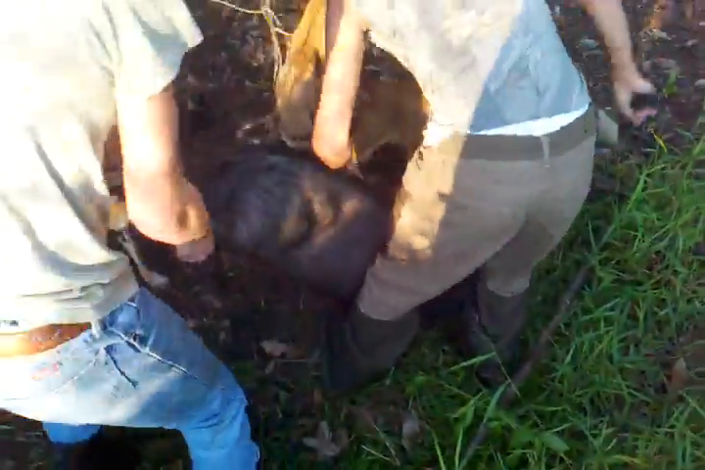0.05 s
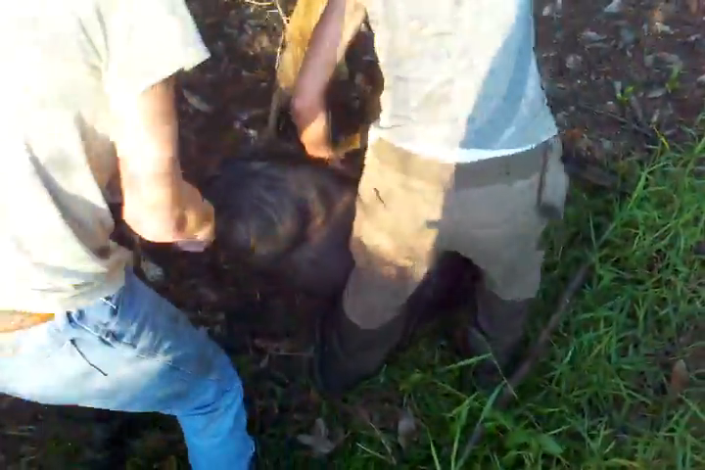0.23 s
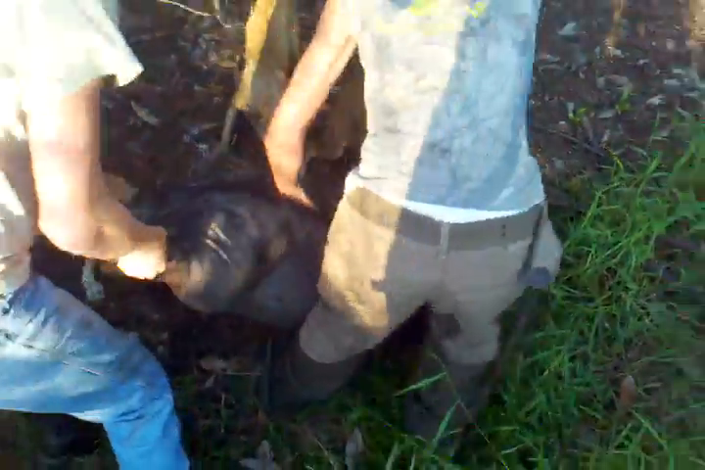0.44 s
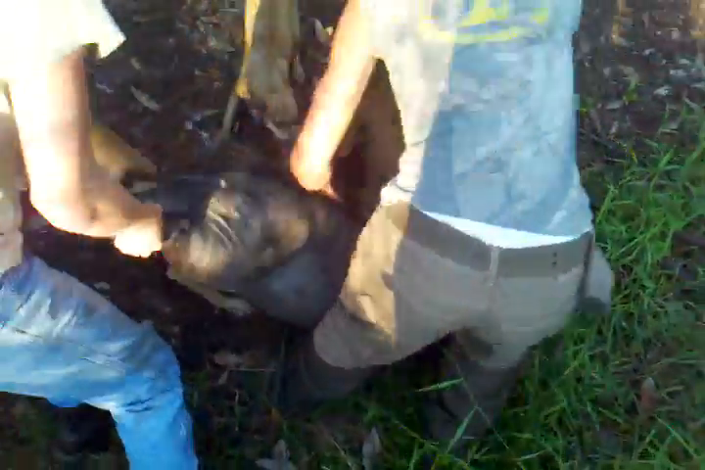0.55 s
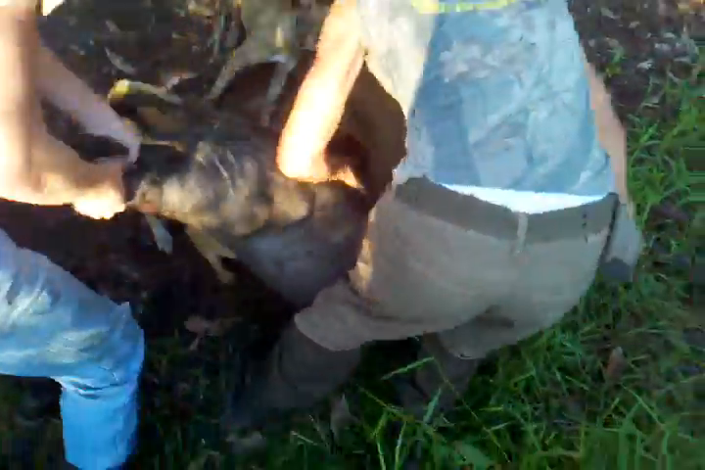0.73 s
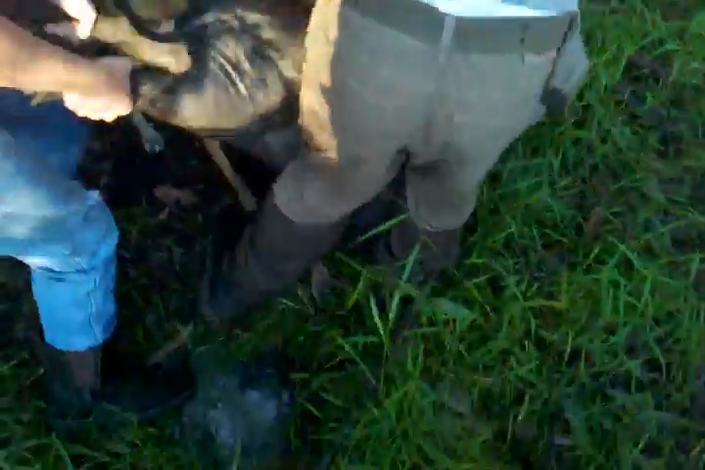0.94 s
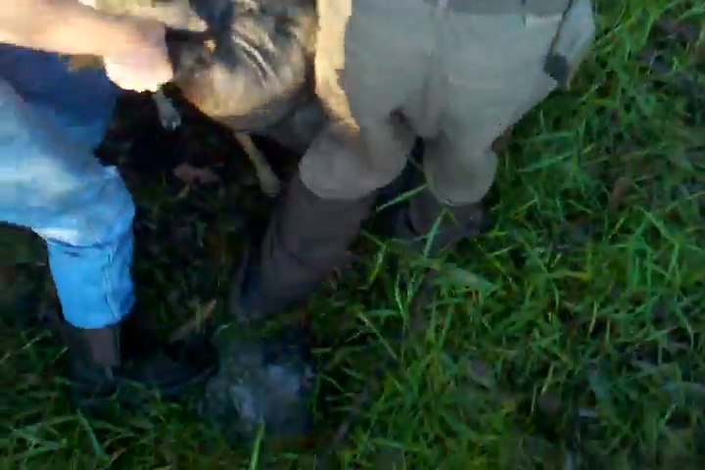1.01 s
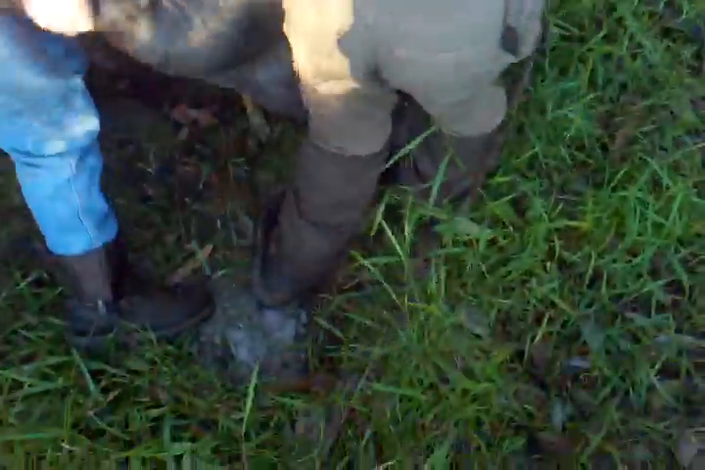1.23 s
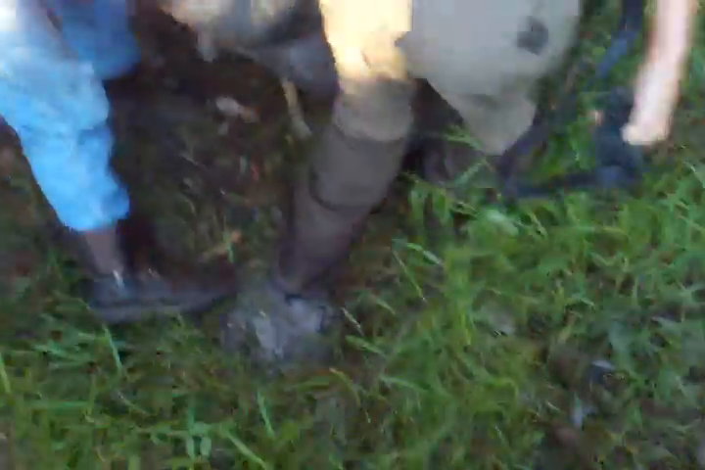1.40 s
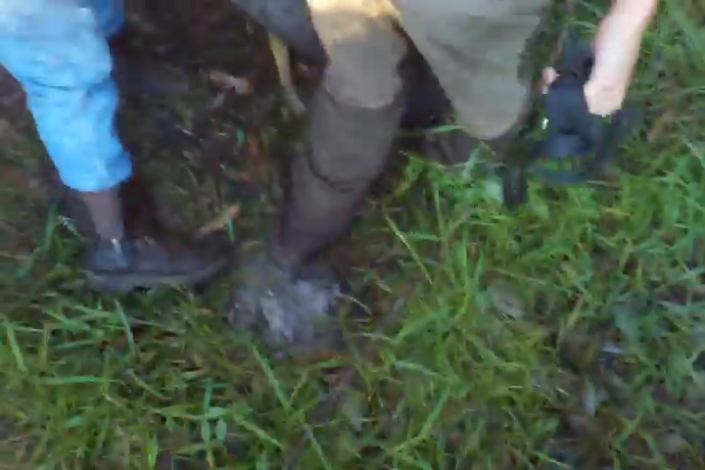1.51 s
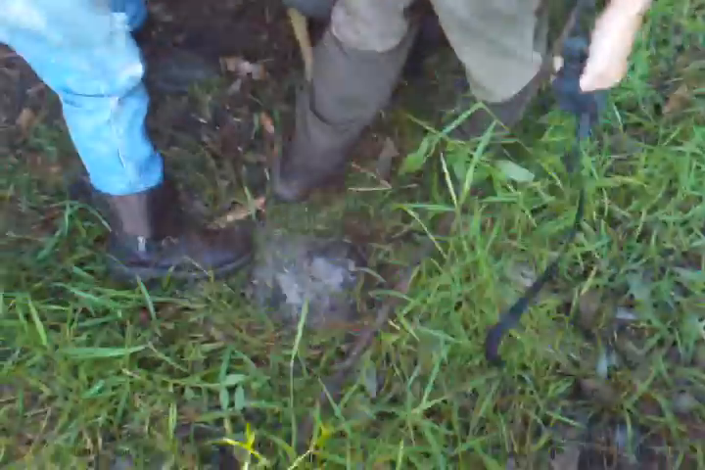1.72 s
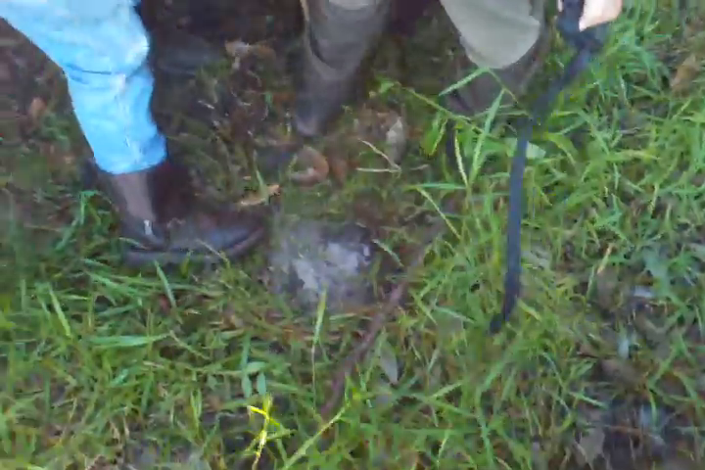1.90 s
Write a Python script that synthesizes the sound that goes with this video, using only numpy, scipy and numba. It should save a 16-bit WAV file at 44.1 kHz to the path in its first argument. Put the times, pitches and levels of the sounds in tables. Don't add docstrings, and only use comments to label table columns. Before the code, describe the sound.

A pinned hog gives one long shrill squeal, starting almost at once, raspy and wavering, close to a small handheld camera outdoors; it stops abruptly, leaving faint leaf rustle and a few twig ticks.

```python
import sys
import numpy as np
from scipy import signal
from scipy.fft import rfft, irfft, next_fast_len
from scipy.io import wavfile
from scipy.ndimage import uniform_filter1d
from numba import njit

SR = 44100
rng = np.random.default_rng(int(sys.argv[2]) if len(sys.argv) > 2 else 0)


def convert_level_to_amplitude(level_db):
    exponent = np.asarray(level_db, float) / 20
    return 10 ** exponent


def bounce(signal):
    frames = np.transpose(np.atleast_2d(signal))
    limited = np.clip(frames, -1, 1)
    pcm = np.round(limited * 32767).astype(np.int16)
    wavfile.write(sys.argv[1], SR, pcm)


N = 85995

# (frequency [Hz], density [dB per Hz])
FIELD_COLOUR = [(100, -7.5), (900, -8), (1300, -7.5), (2300, -12.5), (3000, -20), (4500, -17), (8000, -8.5),
                (14000, -22.5)]
# (time [s], effort [dB], mouth resonance [Hz], mouth strength [dB], flutter rate [1/s])
BREATH = [(.055, -27.5, 1600, -39, 172), (.13, -29, 1465, 8, 193), (.24, -31.5, 1517, 2, 193.6),
          (.32, -28.5, 1720, 8.5, 192), (.45, -29.5, 1707, 9, 194), (.5, -28.5, 1777, 5, 208),
          (.57, -25, 1676, 10, 212), (.69, -26, 1688, 2.5, 195), (.79, -26.5, 1810, 6, 184),
          (.89, -26, 1996, 2, 212), (1.04, -27, 1590, 2.5, 206), (1.19, -28.5, 1590, -6, 195.3),
          (1.29, -26.5, 1902, 4, 216), (1.4, -26.5, 1586, -0.5, 169), (1.555, -26, 1562, 3, 173),
          (1.61, -30.5, 1700, 14.5, 180), (1.655, -29.5, 1411, 12.5, 205), (1.685, -35.5, 1192, -10, 208)]
# (centre [Hz], width [Hz], level before [dB], level after [dB])
THROAT = [(216, 100, -22.5, -22), (350, 160, -17.5, -19), (440, 85, -23.5, -10.5), (585.7, 65, -11, -15),
          (722, 63, -14.5, -12.5), (763, 97, -15.5, -8.5), (1094, 337, -10, -2.5), (1450, 840, -3, -4.5),
          (2174, 380, -3, -2), (2728, 105, -9, -3)]
# (time [s], nose resonance [Hz], nose [dB], overtones [dB], palate resonance [Hz], palate [dB])
PALATE_NOSE = [(.12, 4240, -11, -3, 2080, -5), (.17, 4070, -12, -5, 1900, 2.5),
               (.25, 4100, -11, -9, 1960, -16), (.32, 4170, -4, -12, 1850, -3.5),
               (.42, 4050, -13, -2.5, 1960, 3.5), (.53, 4230, -7.5, 3, 2110, 6.5),
               (.66, 4130, -17, -2, 2020, -15), (.73, 4200, -6, -3, 2100, 0.5),
               (.87, 4700, -6.5, -1.5, 2156, 3.5), (.91, 4580, -15, -0.5, 2080, -7),
               (.99, 4220, -10, -0.5, 2110, 0.5), (1.14, 4200, -10.5, 7, 2100, -18),
               (1.3, 4818, -10.5, 2, 2260, 3.5), (1.36, 4200, -24, -12, 2098, 4),
               (1.44, 4410, -27, -10, 2150, -1.5), (1.53, 4600, -22, -3.5, 2191, 2.5),
               (1.58, 4650, -7, 1, 2004, -15), (1.67, 4350, -24, 4, 2000, 3)]
# (delay [s], level [dB])
ECHOES = [
    (.011, -15.5),
    (0.023, -24),
    (0.042, -32),
]
# (time [s], pitch [Hz], level [dB], roughness [0-1])
WHISTLE = [(.09, 1259, -51, 0.59), (.33, 1348, -25.5, 0.45), (.5, 1320, -28.5, 0.47),
           (.62, 1270, -19.5, 0.32), (.66, 1347, -15.5, 0.26), (.76, 1302, -17.5, 0.3),
           (.81, 1296, -25.5, 0.8), (.88, 1400, -16, 0.39), (.94, 1387, -20.5, 0.55),
           (1.04, 1398, -10.5, 0.15), (1.12, 1389, -20.5, 0.28), (1.2, 1414, -12.5, 0.19),
           (1.28, 1450, -16, 0.21), (1.38, 1415, -12, 0.54), (1.49, 1430, -14, 0.45),
           (1.55, 1460, -29.5, 0.69), (1.61, 1452, -19, 0.54), (1.675, 1167, -25, 0.64)]
# (multiple of the pitch [-], level over effort [dB])
OVERTONES = [(2, -0.5), (3, -16.5), (4, -14)]
# (time [s], length [s], pitch [Hz], rise [Hz], level [dB])
CATCHES = [
    (0.105, 0.057, 1007, -1, -25.5),
    (0.153, 0.57, 635, -40.5, -35.5),
    (0.151, 0.51, 350, 21, -41.5),
    (0.85, 0.027, 581.6, -9, -23),
    (.87, 0.094, 440, 17, -27),
    (0.932, 0.14, 575, 1, -25.5),
    (1.104, 0.192, 750, 66, -28.5),
    (1.768, 0.06, 790, 116, -49),
]
# (centre [Hz], width [Hz], level [dB])
HISS = [(3376, 102, -13.5), (4170, 400, -16.5), (4600, 400, -13.5), (5890, 770, -6.5), (6310, 550, -5.5),
        (7580, 610, -12), (8440, 610, -7), (8900, 2600, -7.5), (12300, 6900, -11)]
# (time [s], resonance [Hz], level [dB])
TEETH = [(.12, 7200, -31), (.3, 7520, -20.5), (.56, 6960, -5), (.72, 7183, -8), (.88, 7440, -14.5),
         (1.03, 7470, -2), (1.2, 7314, -5), (1.3, 8050, 0), (1.4, 7960, -15.5), (1.53, 6824, -7.5),
         (1.6, 7400, 0.5), (1.67, 6797, -7.5)]
# (time [s], level [dB])
BUMPS = [
    (.425, -60),
    (0.72, -54),
    (0.901, -75),
    (1.44, -61),
]
# (time [s], peak [dB], centre [Hz])
TICKS = [
    (1.7075, -34, 13200),
    (1.7805, -30, 10200),
    (1.7805, -36, 7300),
    (1.781, -43, 4500),
    (1.835, -48, 600),
    (1.761, -52, 800),
]

FLUTTER_SHIMMER_DB, BEAT_DEPTH = -1.5, 0.5
TIME = np.arange(N) / SR


def in_time(rows):
    s, *columns = np.transpose(rows)
    return [np.interp(TIME, s, c) for c in columns]


def rms_one(x):
    return x / np.sqrt(np.mean(x ** 2) + 1e-20)


def drift(rate):
    r = np.exp(-2 * np.pi * rate / SR)
    noise = rng.standard_normal(N + 9000)
    return rms_one(signal.lfilter([1], [1, -2 * r, r * r], noise)[9000:])


def cut(x, hz, kind, order=2):
    return signal.sosfilt(signal.butter(order, min(hz, .45 * SR), kind, fs=SR, output="sos"), x)


def phase_of(hz):
    return 2 * np.pi * np.cumsum(hz) / SR


@njit
def glide(x, c, r):
    y = np.zeros_like(x)
    for i in range(2, len(x)):
        y[i] = (1 - r * r) / 2 * (x[i] - x[i - 2]) + 2 * r * c[i] * y[i - 1] - r * r * y[i - 2]
    return y


def resonance(x, hz, width_hz):
    c = np.cos(2 * np.pi * hz / SR) * np.ones(N)
    r = np.exp(-np.pi * width_hz * 1.5 / SR)
    return rms_one(np.array([glide(glide(v, c, r), c, r) for v in x]))


def evened(x):
    local = uniform_filter1d(np.mean(x ** 2, axis=0), int(0.0088 * SR)) + 0.045
    return rms_one(x / local ** 0.2)


def envelope(rows):
    return np.clip((TIME - rows[0][0]) / 0.06, 0, 1) * np.clip((rows[-1][0] - TIME) / 0.012, 0, 1)


def channel_noise():
    shared, a, b = rng.standard_normal((3, N))

    def mix(alike):
        return np.sqrt(alike) * shared + np.sqrt(1 - alike) * np.array([a, b])

    return cut(mix(0.75), 3750, "low") - cut(mix(0.087), 3750, "high")


def field():
    f = np.fft.rfftfreq(N, 1 / SR) + 1
    hz, db = np.transpose(FIELD_COLOUR)
    colour = convert_level_to_amplitude(np.interp(np.log(f), np.log(hz), db))
    return rms_one(irfft(rfft(channel_noise()) * colour, N)) * convert_level_to_amplitude(-49 + drift(39))


def flutter(rate):
    cycle = phase_of(rate * (1 + 0.12 * drift(64.57)))
    puff = rms_one((1 + np.cos(cycle)) / 2 * convert_level_to_amplitude(FLUTTER_SHIMMER_DB * drift(33)))
    return cycle, puff


def throat_source(cycle, puff):
    closures = np.diff(np.floor(cycle / (2 * np.pi) + .5), prepend=0)
    snaps = rms_one(closures * convert_level_to_amplitude(FLUTTER_SHIMMER_DB * drift(70)))
    noise_share = 0.64
    return snaps * (1 - noise_share) + noise_share * puff * channel_noise()


def throat_rasp(source):
    turned = np.clip((TIME - 0.87) / 0.057, 0, 1)
    rasp = 0
    for k, (hz, width_hz, before_db, after_db) in enumerate(THROAT):
        ring = evened(resonance(source, hz * (1 + 0.028 * drift(10.0)), width_hz))
        level_db = before_db + (after_db - before_db) * turned + 2.0 * drift(3.27)
        rasp = rasp + (-1) ** k * convert_level_to_amplitude(level_db) * ring
    return cut(rasp, 120, "high")


def mouth_ring(source, cycle, mouth_hz, mouth_db, palate_hz, palate_db):
    sung = np.sin(phase_of(mouth_hz + 22 * drift(69))) * (1 + BEAT_DEPTH * np.cos(cycle))
    ring = evened(resonance(source, mouth_hz, 148))
    mouth = convert_level_to_amplitude(mouth_db - 1.2) * (ring + convert_level_to_amplitude(-4 + 1.8 * drift(74)) * sung)
    return mouth - convert_level_to_amplitude(palate_db) * evened(resonance(source, palate_hz, 330))


def trees(x):
    dull = cut(x, 1970, "low")
    return sum(convert_level_to_amplitude(db) * np.pad(dull, ((0, 0), (int(s * SR), 0)))[:, :N] for s, db in ECHOES)


def whistle(cycle, effort_db, over_db):
    hz, level_db, rough = in_time(WHISTLE)
    wander = 91.9 * rough * drift(119.6)
    ground, upper = phase_of(hz + wander), phase_of(hz + 0.447 * wander)
    beat = 1 + BEAT_DEPTH * np.cos(cycle) * convert_level_to_amplitude(3.1 * np.clip(drift(25), -3, 1))
    swell_db = 5.5 * np.clip(rough, 0, 1) * np.clip(drift(62), -3, 1)
    tone = beat * convert_level_to_amplitude(level_db + swell_db) * np.sin(ground)
    shrill = sum(convert_level_to_amplitude(db + over_db + 3.8 * drift(16)) * np.sin(k * upper) for k, db in OVERTONES)
    return np.sqrt(2) * envelope(WHISTLE) * (tone + convert_level_to_amplitude(effort_db) * shrill)


def catches():
    out = np.zeros((2, N))
    for s, length, hz, rise_hz, db in CATCHES:
        u = np.clip((TIME - s) / length, 0, 1)
        note = np.sin(phase_of(hz + rise_hz * u + 24 * drift(90.4)))
        out += convert_level_to_amplitude(db + 0.83 * drift(29)) * np.sin(np.pi * u) * note
    return out


def breath_hiss(source, puff, nose_hz, nose_db):
    gate = 0.039
    air = [(1 - gate + gate * puff) * channel_noise() for _ in range(2)]
    hiss = 0
    for k, (hz, width_hz, db) in enumerate(HISS):
        patch_db = 4.5 / (1 + width_hz / 1500) * drift(14.0)
        band = resonance(air[k % 2], hz * (1 + .022 * drift(3.9)), width_hz)
        hiss = hiss + convert_level_to_amplitude(db + patch_db) * band
    nose_sung = convert_level_to_amplitude(-19.5) * np.sin(phase_of(nose_hz + 60 * drift(59)))
    nose = evened(resonance(source, nose_hz, 220)) + nose_sung
    teeth_hz, teeth_db = in_time(TEETH)
    teeth = convert_level_to_amplitude(teeth_db) * evened(resonance(source, teeth_hz, 300))
    hiss = hiss + convert_level_to_amplitude(nose_db + 3.2 * drift(8.3)) * nose + teeth
    rise, end = 1 + np.exp((0.13 - TIME) / .012), 1 + np.exp((TIME - 1.668) / 0.0035)
    return hiss / rise / end


def hog():
    effort_db, mouth_hz, mouth_db, rate = in_time(BREATH)
    nose_hz, nose_db, over_db, palate_hz, palate_db = in_time(PALATE_NOSE)
    cycle, puff = flutter(rate)
    source = throat_source(cycle, puff)
    breath = throat_rasp(source) + mouth_ring(source, cycle, mouth_hz, mouth_db, palate_hz, palate_db)
    breath = breath + breath_hiss(source, puff, nose_hz, nose_db)
    return whistle(cycle, effort_db, over_db) + envelope(BREATH) * convert_level_to_amplitude(effort_db) * breath


def wind_puffs():
    thud = rms_one(cut(channel_noise(), 128, "low", order=4))
    return thud * sum(convert_level_to_amplitude(db + 16.5) * np.exp(-((TIME - s) / 0.016) ** 2) for s, db in BUMPS)


def twig_ticks():
    out, noise = np.zeros((2, N)), channel_noise()
    for s, db, hz in TICKS:
        fade = (TIME > s) * np.exp(-np.maximum(TIME - s, 0) * hz / 9.0)
        out += convert_level_to_amplitude(db) * fade * resonance(noise, hz, 0.49 * hz)
    return out


def scene():
    cry = hog()
    return field() + cry + trees(cry) + catches() + wind_puffs() + twig_ticks()


def top_cut(x):
    return signal.sosfilt(signal.butter(12, 15290, fs=SR, output="sos"), x)


def record(dry):
    size = 2 * next_fast_len(N // 2 + 2000)
    f = np.fft.rfftfreq(size, 1 / SR)
    turn = np.pi * (f / 2940 - .5)
    low_spread = 0.26
    turn = low_spread * np.tanh(-np.minimum(turn, 0) / low_spread) + np.maximum(turn, 0)
    turn = turn + 1.2 / (1 + (f / 119) ** 4)
    fill = 1j * .3 * np.minimum(f / 7700, 1) ** 3
    limit = .62
    a, b = rfft(limit * np.tanh(dry / limit), size)
    mid_comb = np.cos(turn) * abs(np.cos(turn)) ** 0.1 + fill
    side_comb = (np.sin(turn) + fill) * np.exp(1j * 1.17)
    mid = irfft(a * mid_comb, size)[:N]
    side = irfft(b * side_comb, size)[:N] * convert_level_to_amplitude(-1.6)
    x = cut(np.array([mid + side, mid - side]), 145, "high")
    x = signal.sosfilt(signal.cheby2(22, 50, 14180, fs=SR, output="sos"), x)
    return top_cut(x)


dry = scene()
out = record(dry)
bounce(out)
```